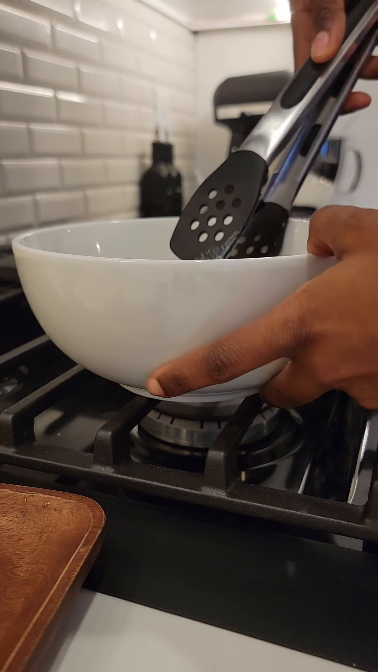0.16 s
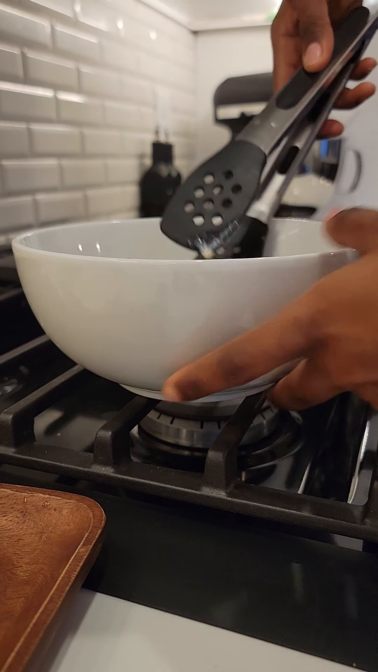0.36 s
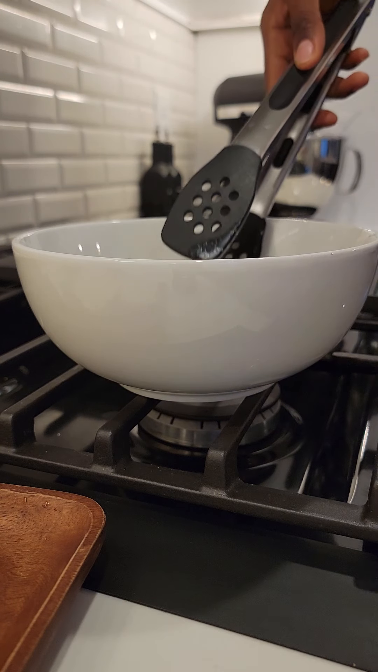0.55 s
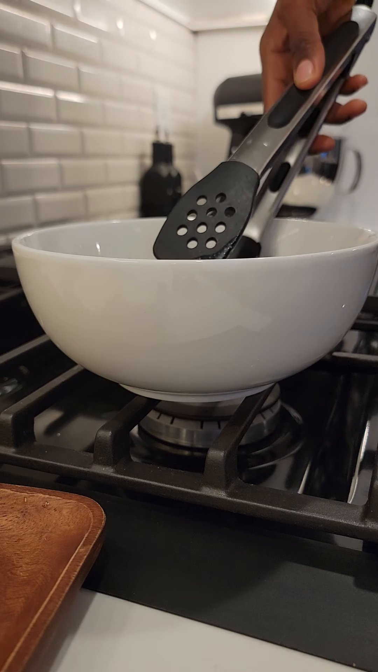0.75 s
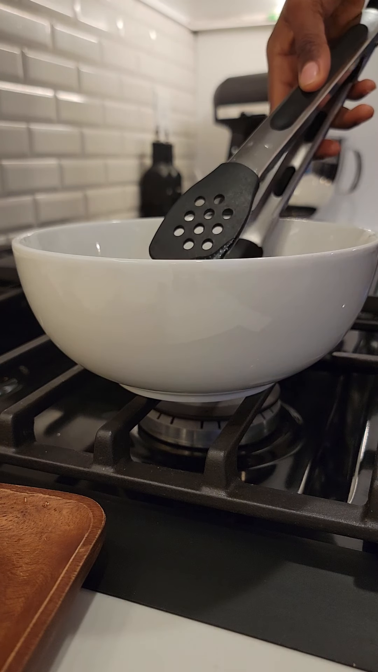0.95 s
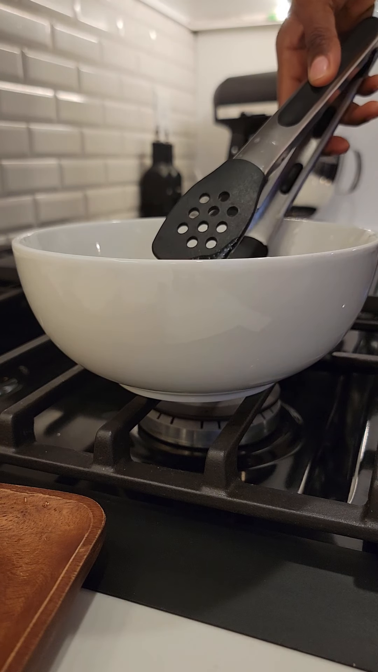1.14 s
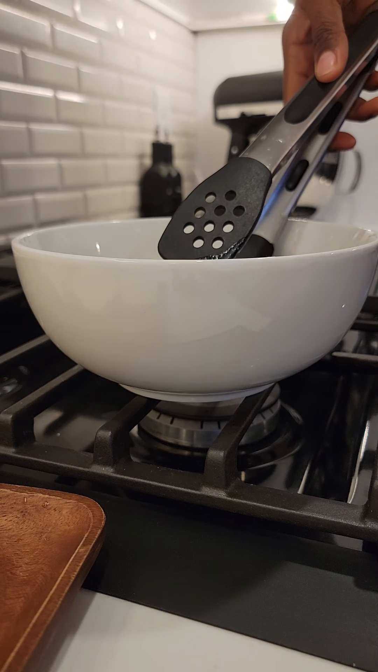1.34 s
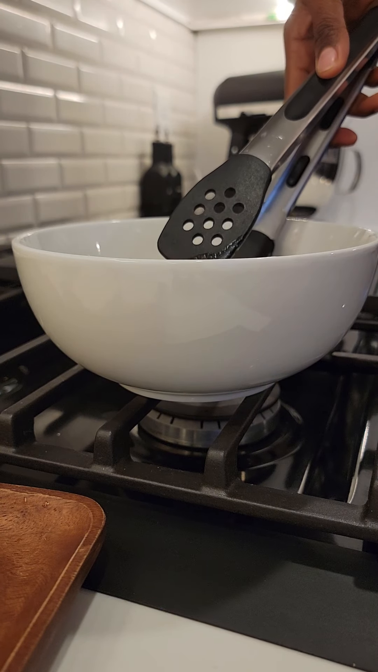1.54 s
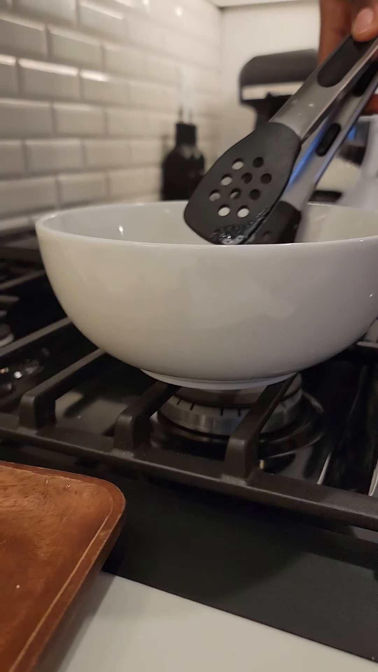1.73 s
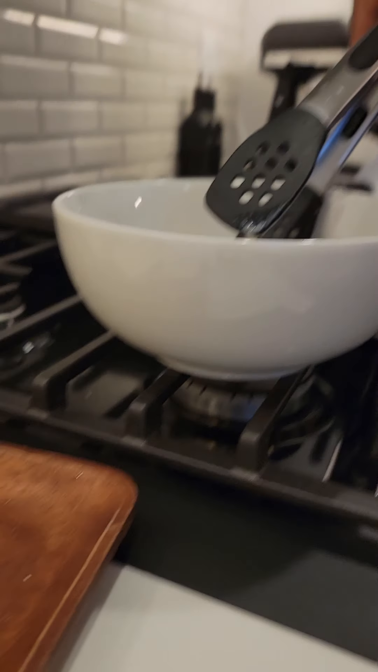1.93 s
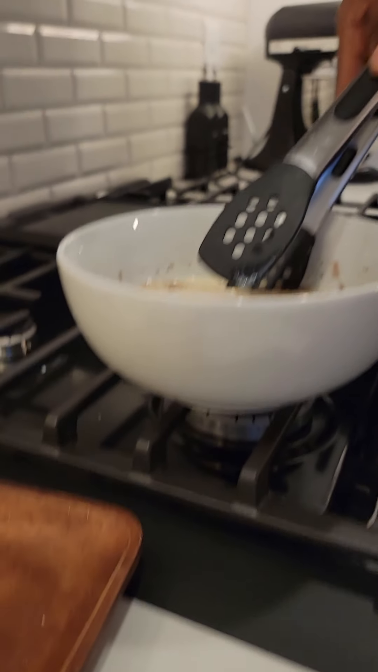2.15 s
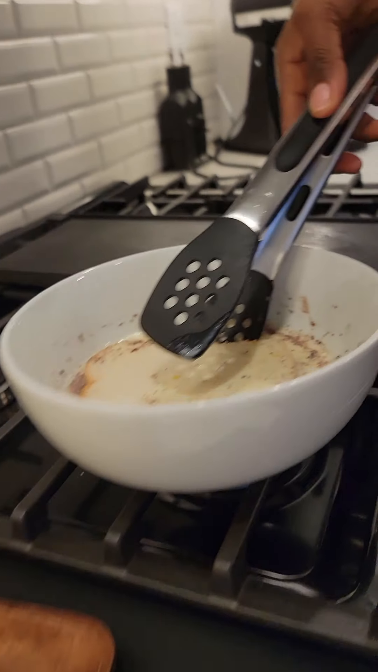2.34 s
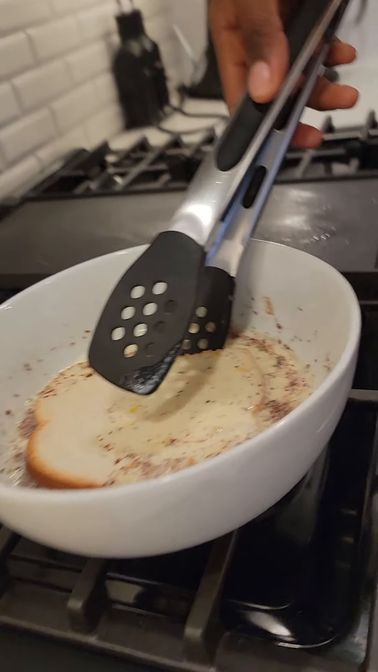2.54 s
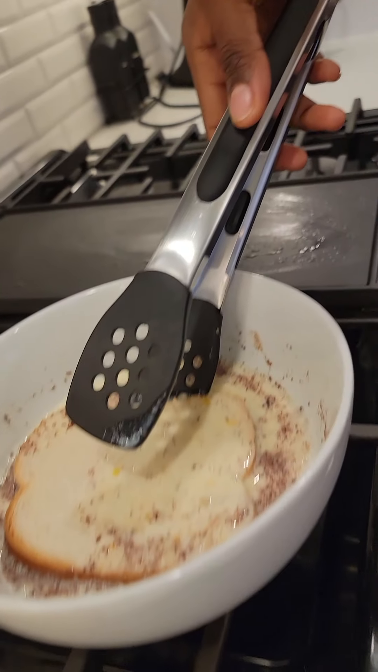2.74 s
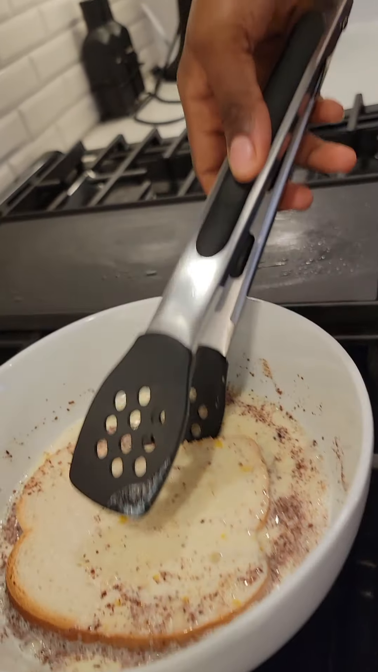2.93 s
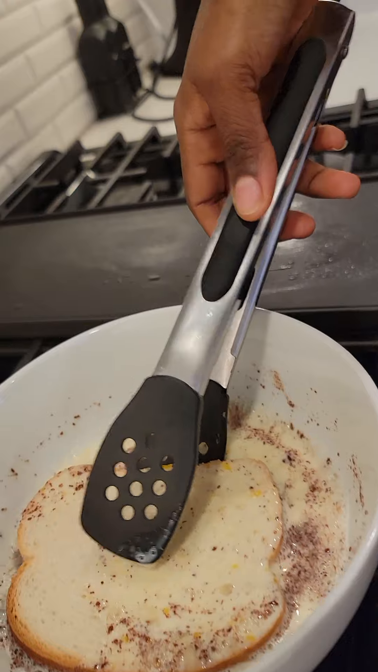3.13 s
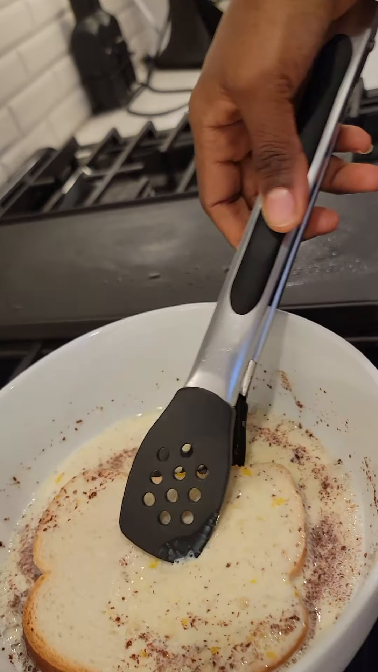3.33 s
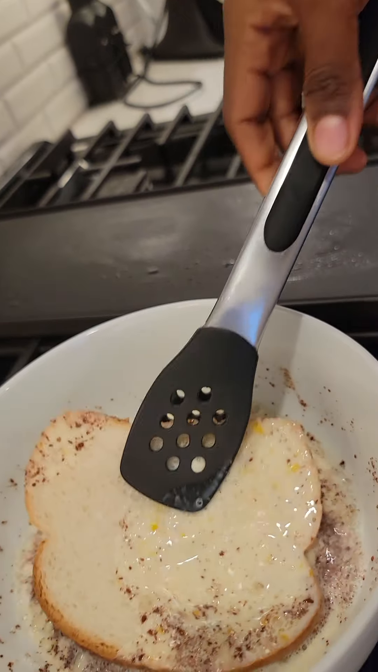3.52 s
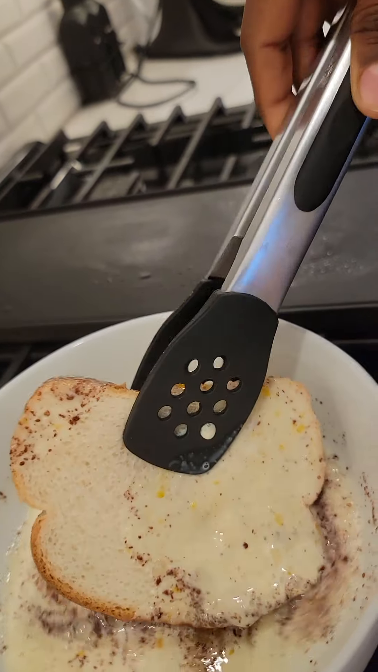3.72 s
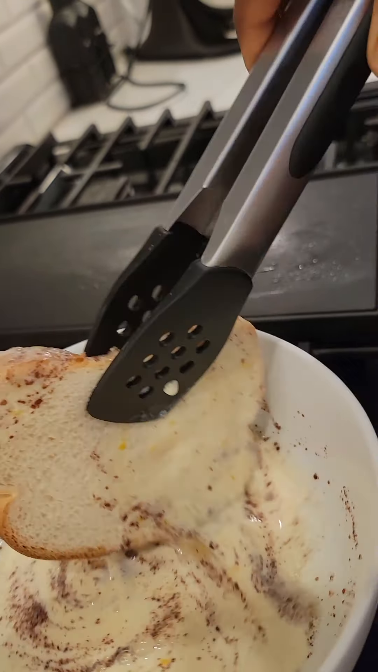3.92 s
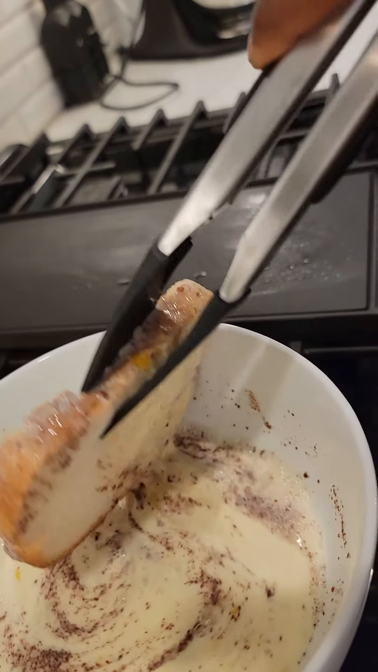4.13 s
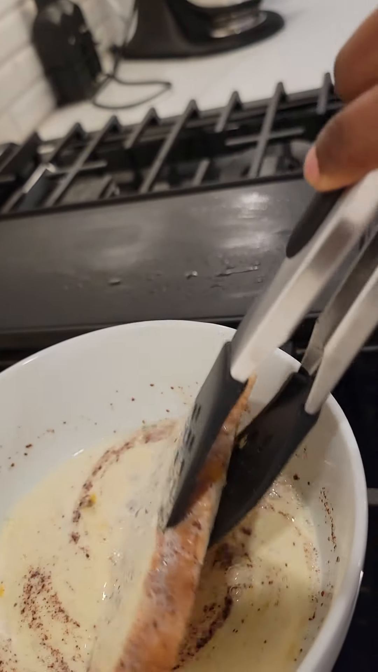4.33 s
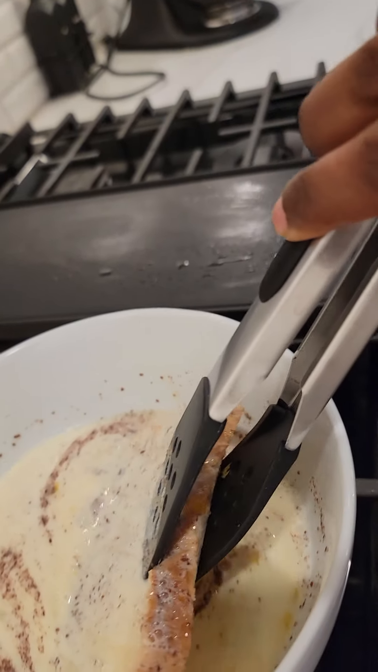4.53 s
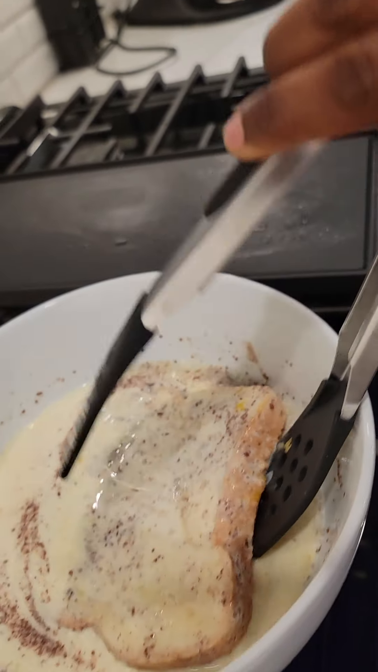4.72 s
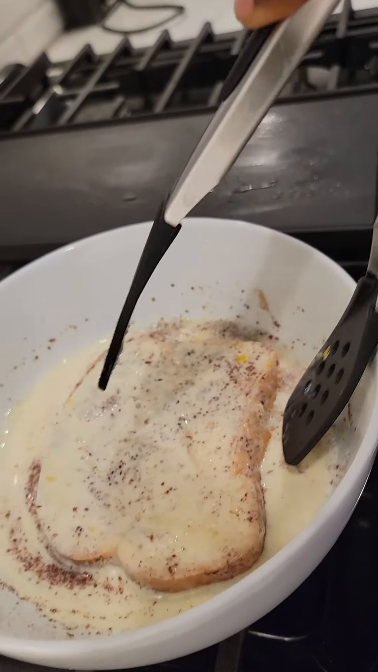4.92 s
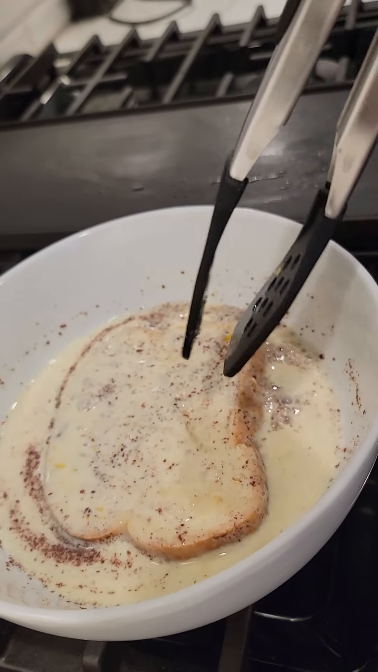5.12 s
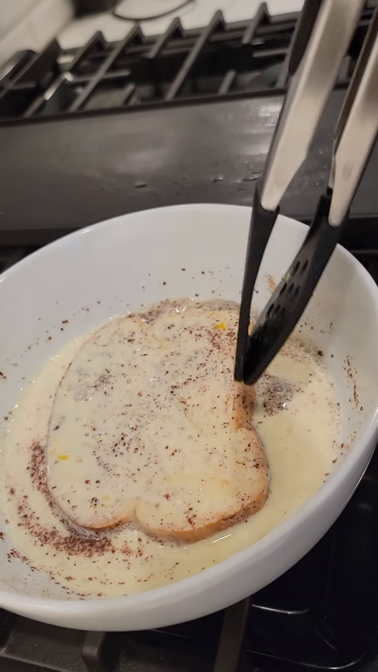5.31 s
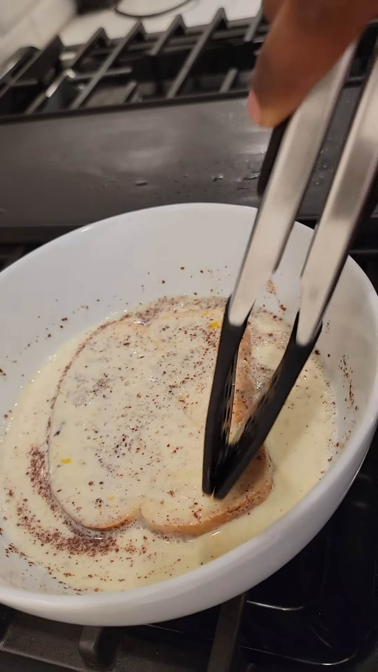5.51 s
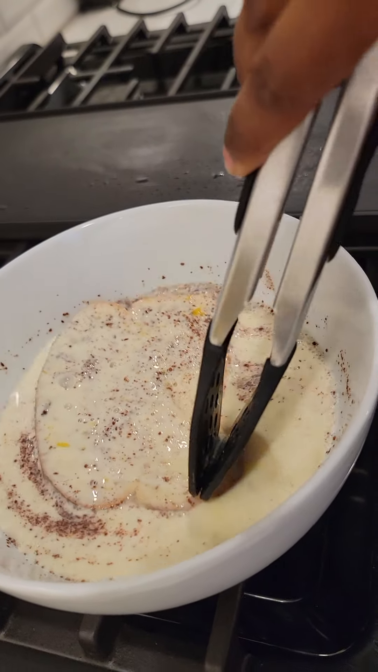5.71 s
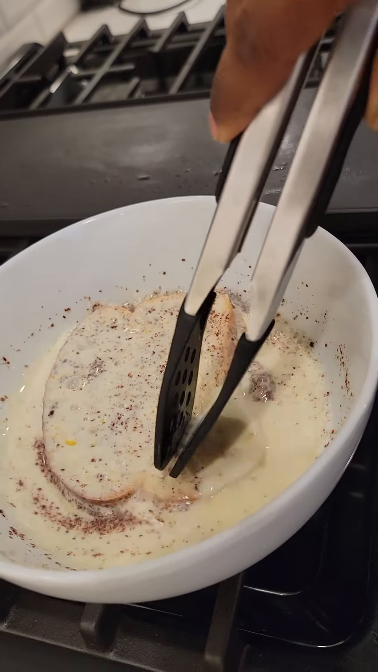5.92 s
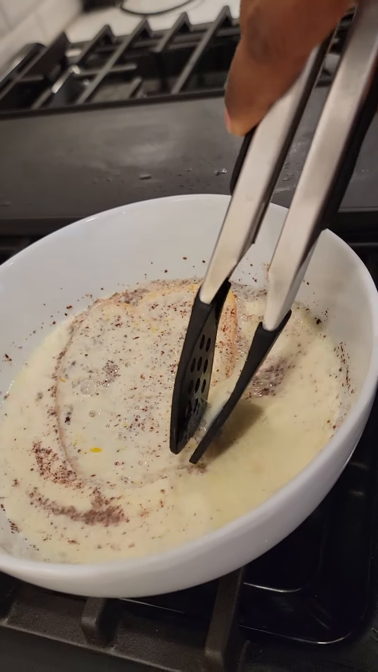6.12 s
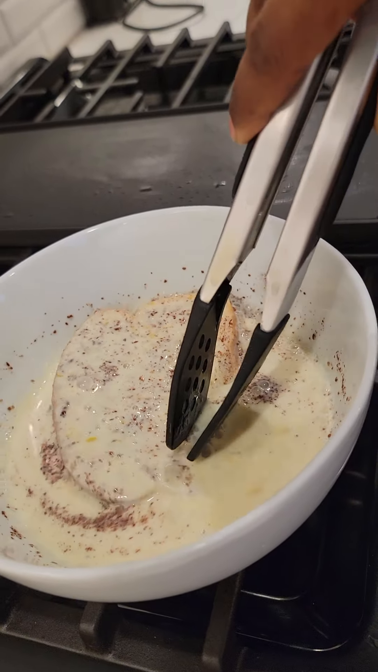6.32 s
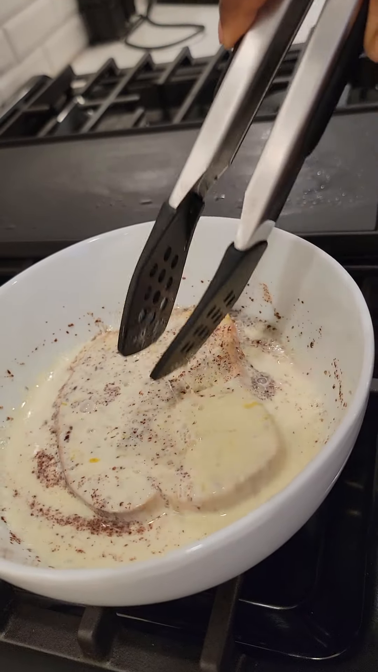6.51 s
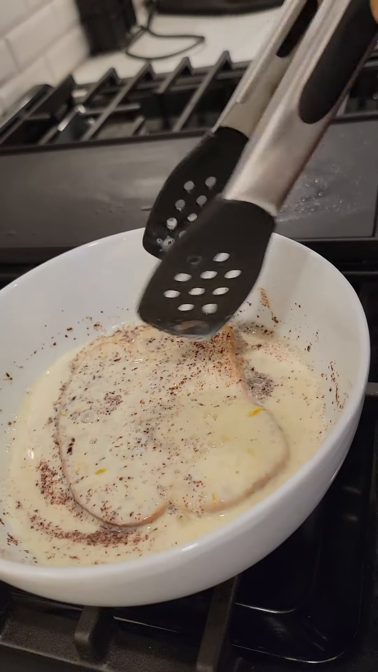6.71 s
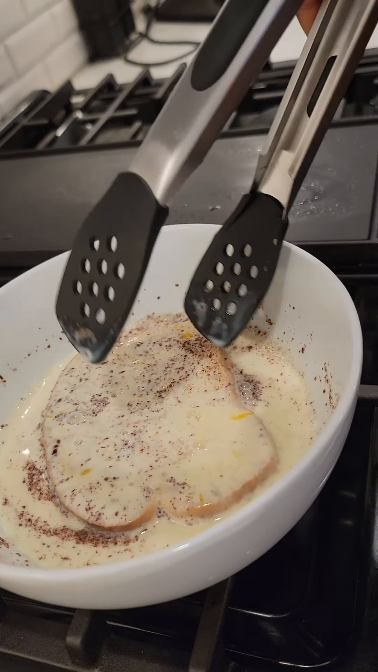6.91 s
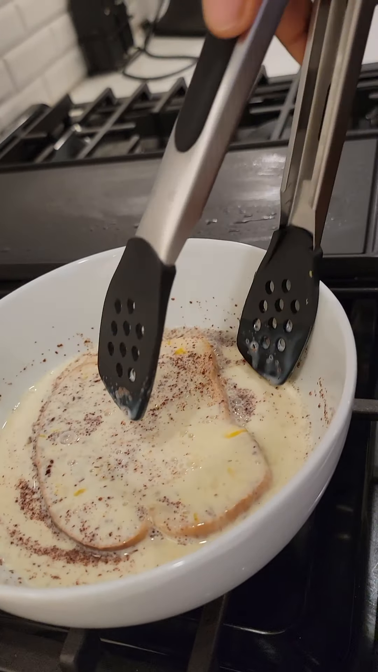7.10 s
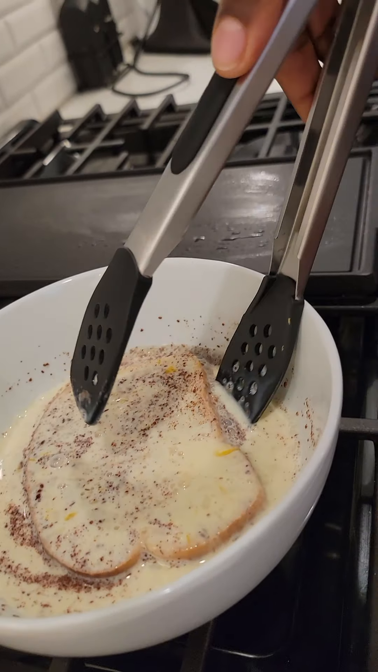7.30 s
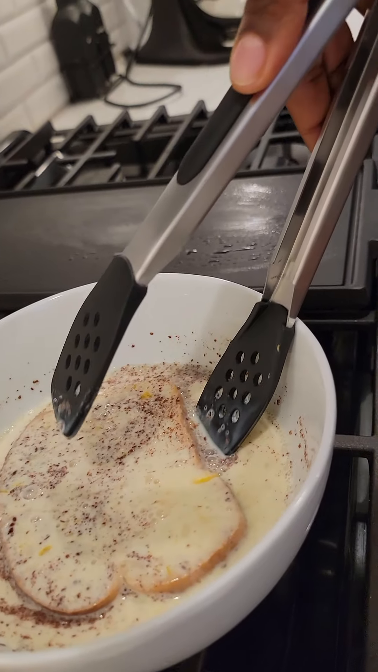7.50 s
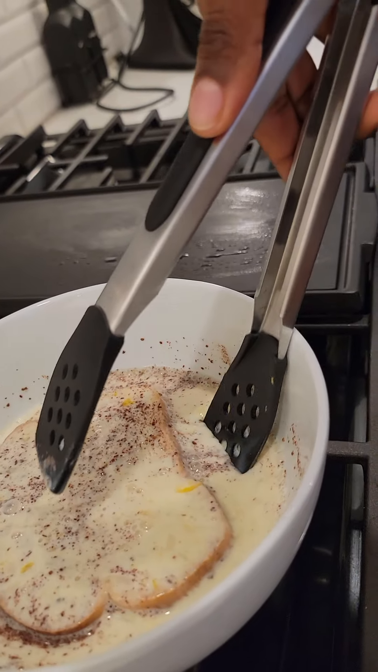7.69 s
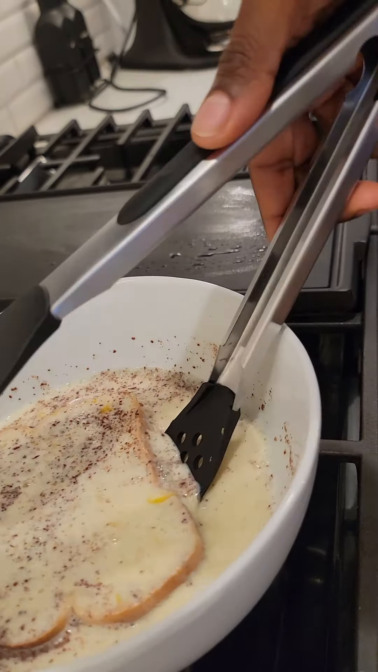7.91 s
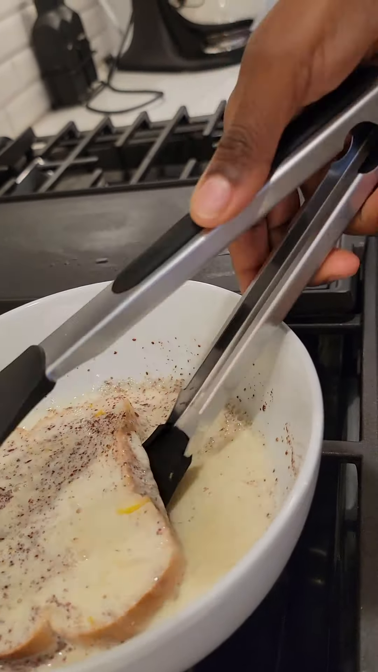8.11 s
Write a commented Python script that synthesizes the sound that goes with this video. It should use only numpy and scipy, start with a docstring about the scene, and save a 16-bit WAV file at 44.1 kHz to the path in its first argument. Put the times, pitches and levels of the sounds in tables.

```python
"""In a small tiled kitchen, tongs dip bread in egg mixture in a ceramic bowl on a stove grate.
The tips tap and drag along the wall and once spring open against it: decaying sines ring, noise clacks.
The hinge snaps in short noise bursts; knocks are damped sines; the bowl rocks on the grate with a low rumble.
Echoes and a noise-made tail answer the bright sounds, over shaped air noise and a wavering appliance hum."""
import sys
import numpy as np
from scipy import signal
from scipy.fft import rfft, irfft
from scipy.io import wavfile
from scipy.ndimage import uniform_filter1d

SR = 44100
rng = np.random.default_rng(int(sys.argv[2]) if len(sys.argv) > 2 else 0)


def int16_out(signal):
    """Quantize to a 16-bit WAV file."""
    q = np.round(np.clip(np.atleast_2d(signal).T, -1, 1) * 32767)
    wavfile.write(sys.argv[1], SR, q.astype(np.int16))


N = 359415  # length in samples


def amp(db):
    """Turns decibels into a gain."""
    return 10 ** (np.asarray(db) / 20)


def unit(x):
    """Scales a sound to an rms of 1."""
    return x / np.sqrt(np.mean(x ** 2) + 1e-20)


def read(points, hz):
    """Joins (Hz, value) points by straight lines on a log-frequency axis."""
    point_hz, value = np.transpose(points)
    return np.interp(np.log(hz + 1), np.log(point_hz + 1), value)


def add(mix, s, sound):
    """Mixes a sound in at time s, cutting what runs past the end."""
    part = mix[:, round(s * SR):][:, :sound.shape[-1]]
    part += sound[..., :part.shape[1]]


def sides(balance_db):
    """Gives left and right gains; a negative balance makes the right side louder."""
    return amp(np.array([[balance_db], [-balance_db]]) / 2)


def noise(colour_db, size):
    """Makes two unrelated noises whose spectrum follows the function colour_db(Hz)."""
    hz = np.fft.rfftfreq(size, 1 / SR)
    random_phase = np.exp(2j * np.pi * rng.random((2, len(hz))))
    return unit(irfft(random_phase * amp(colour_db(hz)), size))


def fade(t, rise, t60):
    """A quick swell, then a decay that loses 60 dB in t60 seconds."""
    return (1 - np.exp(-t / rise)) * np.exp(-np.log(1000) * t / t60)


def taps():
    """A harder blow is brighter, quicker and clacks more; a heavy one squashes the soft tip."""
    # tongs on the bowl: start_s, level_db, left_right_db, hardness_db, free_ring_db,
    # lower_contact_pitch_hz, upper_contact_pitch_hz
    blows = [(0.4455, -30.5, -2.5, 3.5, -29.5, 754, 1450), (0.5180, -45, -1, -3, -0.5, 813, 2050),
             (0.7258, -35.5, -1.5, 4, -40, 742, 1430), (1.3778, -37.5, -2.5, -4, -36, 793, 2123),
             (2.0487, -55.5, -3, -6, -17, 820, 2170), (2.4425, -37, 0, 7, -55, 810, 1153),
             (4.783, -5.5, -3, -2, -26, 740, 1387), (7.8245, -30, -4.5, -5.5, -48, 670, 1346)]
    average_rise_s, average_clack_db = 0.0013, 4
    lower_db, upper_db = -3, -5  # the contact tones before squashing
    give_db = -18.5  # around this level the soft tip begins to give way
    free_hz = 2150  # centre of the modes that a resting tip leaves free
    for s, level_db, balance_db, hard_db, free_db, lower_hz, upper_hz in blows:
        squash_db = 20 * np.log10(1 + amp(level_db - give_db))
        clack_db = average_clack_db + 0.7 * hard_db
        rise = average_rise_s * amp(-0.5 * hard_db)
        yield s, tap(level_db, balance_db, hard_db, clack_db, rise, free_db, free_hz,
                     lower_hz, lower_db - squash_db, upper_hz, upper_db - squash_db)


def drag(count=6):
    """A tip sticks and slips along the wall; the last slip lets the bowl ring."""
    # loudness along the drag: time_s, level_db
    drag_level = [(3.0, -52), (3.04, -57), (3.078, -37), (3.1, -38.5)]
    # the two contact tones of a slip: pitch_hz, level_db
    slip_tones = [(1200, -2.5), (2165, -1)]
    release_s, slip_gap_s, rise_s = 3.099, 0.016, 0.004
    held_db, released_db, free_hz = -42, -16, 5470  # free ring while held, after release, and its centre
    balance_db, treble_db, clack_db = -1.5, -2.5, 0
    # counted backward: slip 0 is the last one
    for k in range(count):
        s = release_s - k * slip_gap_s
        level_db = np.interp(s, *np.transpose(drag_level))
        free_db = held_db if k else released_db
        yield s, tap(level_db, balance_db, treble_db, clack_db, rise_s, free_db, free_hz,
                     *slip_tones[0], *slip_tones[1])
    # the lower tone sings on after the last slip
    yield release_s, knock(-54.5, slip_tones[0][0], 0.25)


def tap(level_db, balance_db, treble_db, clack_db, rise, free_db, free_hz,
        lower_hz, lower_db, upper_hz, upper_db, spread_db=4):
    """A tip strikes the wall and damps it at once; a weaker part rings on freely."""
    # rim modes of the bowl, some close together: pitch_hz, touched_db, ringing_free_db, free_t60_s
    bowl_modes = [(819, -32, -1, 0.96), (2050, -11, -5, 0.73), (3464, -5, -16.5, 0.45),
                  (3584, 0.5, -16, 0.85), (3622, -4.5, -12, 0.85), (3664, -7, -16.5, 0.45),
                  (5460, -12, -4, 0.45), (5530, -9.5, -9, 0.38), (7590, -15.5, -9, 0.29),
                  (9860, -15.5, -2.5, 0.25), (12490, -19.5, 3.5, 0.2), (15260, -17, -1.5, 0.24)]
    # colour of the dense, short ring of the tongs: frequency_hz, relative_level_db_per_hz
    clack_colour = [(100, -37), (520, -27), (750, -1), (1000, -13), (1250, -2), (1500, -2), (2000, -4.5),
                    (2800, 1.5), (3600, -8), (4500, -14.5), (6500, -16.5), (7600, -8), (9000, -29.5),
                    (16000, -31.5)]
    touched_t60, contact_t60, clack_t60 = 0.045, 0.062, 0.058  # s
    side_phase = 1.5  # radians by which the left side lags the right
    t = np.arange(SR) / SR

    def tone(hz):
        """A steady sine, later in its cycle on the left."""
        return np.sin(2 * np.pi * hz * t - np.array([[side_phase], [0]]))

    ring = np.zeros((2, SR))
    for hz, touched_db, ringing_db, t60 in bowl_modes:
        # a light blow stays longer in contact and misses the highest modes
        hardness = amp(treble_db * (hz > 4500) + level_db / 6 * max(np.log2(hz / 5500), 0))
        # where the tip rests decides which modes stay free; a light touch frees fewer of them
        spared_db = free_db - spread_db * amp(-level_db / 4) * abs(np.log2(hz / free_hz))
        touched = amp(touched_db) * fade(t, rise, touched_t60)
        free = amp(spared_db + ringing_db) * fade(t, 0.0059, t60)
        ring += hardness * (touched + free) * tone(hz)
    # tip and wall swing together at two pitches set by the grip
    for hz, db in ((lower_hz, lower_db), (upper_hz, upper_db)):
        ring += amp(db) * fade(t, rise, contact_t60) * tone(hz)
    clack_noise = noise(lambda hz: read(clack_colour, hz), SR)
    clack = amp(clack_db - 10.0) * fade(t, rise, clack_t60) * clack_noise
    return amp(level_db) * sides(balance_db) * (ring + clack)


def ticks():
    """The hinge snaps, and the lowest mode of the bowl answers faintly."""
    # light snaps of the hinge: start_s, level_db, centre_hz, t60_s
    hinge_snaps = [(0.205, -53.5, 3860, 0.047), (0.768, -44, 2900, 0.011), (1.776, -45.5, 2340, 0.04),
                   (1.869, -54, 4500, 0.019), (4.306, -55, 4500, 0.035), (6.890, -39, 3530, 0.034),
                   (7.866, -44.5, 2800, 0.12), (8.063, -49.5, 4300, 0.025)]
    for s, level_db, centre_hz, t60 in hinge_snaps:
        # a longer snap has a narrower resonance
        octaves = 0.82 * (0.035 / t60) ** 0.56
        yield s, tick(level_db, centre_hz, octaves, t60)
        yield s, knock(level_db - 13, 817, 0.25)


def tick(level_db, centre_hz, octaves, t60):
    """A fading noise burst shaped by one broad resonance."""
    t = np.arange(SR // 4) / SR

    def colour_db(hz):
        """Falls away on both sides of the centre."""
        distance = np.log2((hz + 1) / centre_hz) / octaves
        return -20 * np.log10(1 + distance ** 2)

    return amp(level_db) * fade(t, 0.00013, t60) * noise(colour_db, len(t))


def knocks():
    """Dull knocks and plops last equally many cycles, so low ones last longer; each brings a thud."""
    # knocks and plops: start_s, level_db, pitch_hz
    dull_hits = [(1.672, -42, 744), (1.7761, -24.5, 885), (1.847, -31, 303), (4.011, -39, 600),
                 (6.933, -41.5, 71), (7.718, -39, 750), (8.122, -38, 96)]
    # the stove top shaken by each: pitch_hz, level_against_knock_db, t60_s
    thud_modes = [(87, -13, 0.087), (190, -14, 0.037)]
    cycles = 5.5  # until a knock has died away
    for s, level_db, hz in dull_hits:
        yield s, knock(level_db, hz, cycles / hz)
        for thud_hz, db, t60 in thud_modes:
            yield s, knock(level_db + db, thud_hz, t60)


def knock(level_db, hz, t60):
    """One mode of vibration: a sine that swells within a fraction of a cycle and dies away."""
    t = np.arange(SR // 4) / SR
    return amp(level_db) * sides(-9.0) * fade(t, 0.19 / hz, t60) * np.sin(2 * np.pi * hz * t)


def pushes(count=3):
    """The bowl slides, rings the grate, then rocks to rest; its foot grinds between landings."""
    # pushes on the grate: start_s, level_db, upper_edge_hz, delay_to_landing_s, landing_db, loss_per_rock_db
    bowl_pushes = [(0.182, -39, 780, 0.045, -31.5, 10.5), (4.788, -35, 230.7, 0.0031, -33, 2.6)]
    # grate and bowl ringing together: pitch_hz, level_against_push_db, t60_s
    grate_modes = [(157, -4.5, 0.36), (185, -7.5, 0.15), (352, -7.5, 0.33), (811, -7.5, 0.43)]
    grate_delay_s, rock_gap_s = 0.017, 0.095
    for s, level_db, edge_hz, landing, landing_db, loss_db in bowl_pushes:
        # the slide swells and dies away
        yield s, shift(level_db, 0.021, 0.47, edge_hz)
        for hz, db, t60 in grate_modes:
            yield s + grate_delay_s, knock(level_db + db, hz, t60)
        # each landing shakes the stove top
        for k in range(count):
            yield s + landing + k * rock_gap_s, shift(landing_db - k * loss_db, 0.018, 0.24, 85)
        # the foot grinds on the iron, less each time
        for k in range(count - 1):
            grind_db = level_db - 12 - k * 1.5
            yield s + k * rock_gap_s, tick(grind_db, 1800, 0.6, 0.14)


def shift(level_db, rise, t60, edge_hz, judder_db=3):
    """The foot of the bowl judders on the iron grate and the stove top rumbles: uneven low noise."""
    t = np.arange(SR) / SR

    def colour_db(hz):
        """Cuts the treble above edge_hz and the bass below 56 Hz."""
        return -10 * np.log10((1 + (hz / edge_hz) ** 6) * (1 + (56 / (hz + 1)) ** 4))

    common, apart = noise(colour_db, SR)
    # the strength wanders between 90 random points in a second
    wander = np.interp(t, np.linspace(0, 1, num=90), rng.uniform(-1, 1, size=90))
    rumble = np.array([common + 0.35 * apart, common - 0.29 * apart])
    return amp(level_db) * sides(-2) * amp(judder_db * wander) * fade(t, rise, t60) * rumble


def kitchen(x, tail_db=-11, build=0.008):
    """Near surfaces reflect the sound, then a diffuse tail dies soonest in the high treble."""
    # how long the room rings: frequency_hz, t60_s
    room_decay = [(100, 0.45), (700, 0.5), (2000, 0.5), (4000, 0.39), (8000, 0.35), (15000, 0.22)]
    # reflections from stove, wall and hood: delay_s, left_gain, right_gain
    reflections = [(0.0046, 0.12, 0.1), (0.0108, 0.41, 0.35), (0.0125, 0.15, 0.2)]
    hz, t, z = signal.stft(rng.standard_normal((2, SR)), SR, nperseg=256)
    decay = fade(t, build, read(room_decay, hz)[:, None])
    tail = signal.istft(z * decay, SR, nperseg=256)[1]
    out = amp(tail_db) * signal.fftconvolve(x, tail / np.linalg.norm(tail[0]), axes=1)[:, :N]
    for delay, left, right in reflections:
        add(out, delay, x * np.array([[left], [right]]))
    return out


def air(ripple_db=3.5):
    """Steady kitchen noise whose colour changes as the listening point rises over the bowl."""
    # air noise beside the bowl, then above it: frequency_hz, relative_level_db_per_hz
    beside_colour = [(15, -51), (25, -9), (86, -2.5), (141, -13.5), (179, -8.5), (333, -17), (425, -16.5),
                     (620, -18), (672, -23.5), (812, -21), (1010, -20.5), (1590, -16), (3300, -34.5),
                     (13800, -38.5), (15800, -45.5)]
    above_colour = [(15, -44.5), (25, -16.5), (76, -1.5), (126, -9), (144, -13), (179, -10.5), (205, -13.5),
                    (241, -15), (513, -20), (691, -15), (905, -22), (1820, -20.5), (2260, -31),
                    (4820, -38.5), (15800, -37.5)]
    # resonances: centre_hz, width_hz, height_beside_db, height_above_db
    resonances = [(82, 7.9, 5.5, 3), (336, 24, 11, 8.5), (740, 90, 9.5, 3.5), (1182, 51, 0, 1.5),
                  (1650, 79, 7.5, 4.5), (2913, 120, 7, 4.5), (3590, 100, 8, 5.5), (4810, 820, 4.5, 8.5),
                  (5974, 230, 9, 6.5), (7300, 390, 4.5, 7), (10740, 400, 0.5, 6.5), (12520, 220, 4.5, 5),
                  (15656, 140, 23, 10.5)]
    # left-right likeness: frequency_hz, likeness (1 same, 0 unrelated, -1 opposite)
    likeness = [(60, 0.93), (130, 1), (290, 0.39), (640, 0.3), (1250, -0.33), (1650, -0.29), (3100, 0.0094),
                (15000, -0.05)]
    # left-right level difference: frequency_hz, left_over_right_db
    tilt = [(60, -0.5), (110, -2), (380, -2), (700, -0.5), (1290, -10), (2380, 0.5), (4400, -1.5),
            (15000, -2.5)]
    hz, t = np.fft.rfftfreq(N, 1 / SR), np.arange(N) / SR
    a, b = rfft(rng.standard_normal((2, N)))
    same, balance_db = np.clip(read(likeness, hz), -1, 1), read(tilt, hz)
    left = a * amp(balance_db / 2)
    right = (same * a + np.sqrt(1 - same ** 2) * b) * amp(-balance_db / 2)
    z = np.array([left, right])
    peaks_db = sum(np.outer(heights, np.exp(-((hz - centre) / width) ** 2))
                   for centre, width, *heights in resonances)
    # a fine, random, fixed ripple roughens the noise spectrum, weaker in the bass
    ripple = unit(uniform_filter1d(rng.standard_normal(size=700), size=3))
    ripple_shape = np.interp(np.sqrt(hz / hz[-1]), np.linspace(0, 1, len(ripple)), ripple)
    z *= amp(ripple_db * ripple_shape * hz / (hz + 300))
    beside = amp(-53) * unit(irfft(z * amp(read(beside_colour, hz) + peaks_db[0]), N))
    above = amp(-53) * unit(irfft(z * amp(read(above_colour, hz) + peaks_db[1]), N))
    # 0 beside the bowl, 1 above it; the rise goes from 2.1 to 3.1 s
    height = np.interp(t, [2.1, 3.1], [0, 1])
    return (1 - height) * beside + height * above


def hum(waver=0.35):
    """An appliance motor hums at multiples of its speed, wavering in strength and phase."""
    # motor tones: multiple_of_motor_speed, rms_level_db before the left-right balance
    motor_tones = [(1, -66), (3, -69), (4, -72.5), (5, -77), (8, -78)]
    motor_hz = 59.9
    t, out = np.arange(N) / SR, np.zeros(N)
    knots = np.linspace(0, t[-1], num=40)
    for multiple, db in motor_tones:
        a, b = (np.interp(t, knots, row) for row in rng.standard_normal((2, len(knots))))
        wavering = 1 + waver * (a + 1j * b)
        turning = np.exp(2j * np.pi * multiple * motor_hz * t)
        out += amp(db) * unit((wavering * turning).real)
    return sides(-2) * out


def scene():
    """Bright sounds carry into the room; the dull ones stay close."""
    bright, dull = np.zeros((2, 2, N))
    for mix, sources in ((bright, (taps, drag, ticks)), (dull, (knocks, pushes))):
        for source in sources:
            for s, sound in source():
                add(mix, s, sound)
    return bright + kitchen(bright) + dull + air() + hum()


def record(dry):
    """Clips at full scale, then removes the treble above about 15.9 kHz."""
    lowpass = signal.firwin(511, 15900, window=("kaiser", 9), fs=SR)
    return signal.oaconvolve(np.clip(dry, -1, 1), lowpass[None], "same", axes=1)


dry = scene()
out = record(dry)
int16_out(out)
```